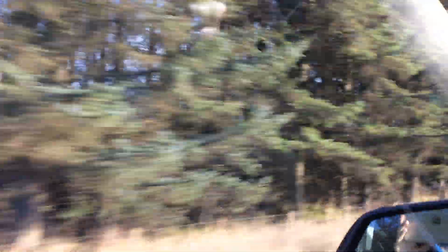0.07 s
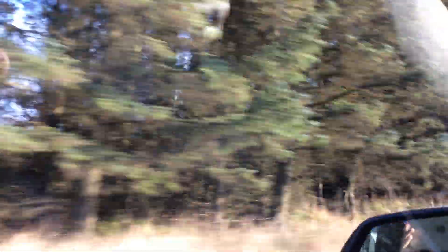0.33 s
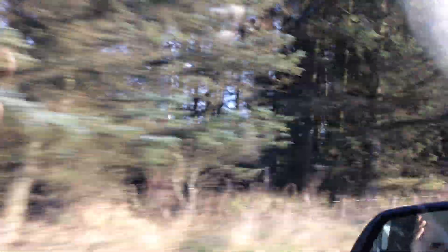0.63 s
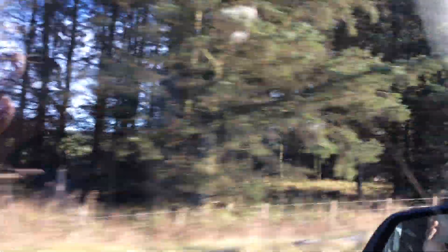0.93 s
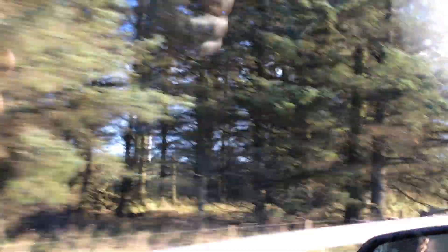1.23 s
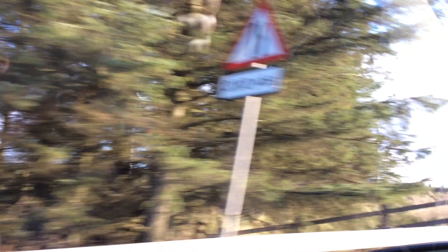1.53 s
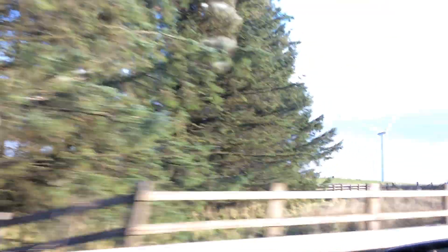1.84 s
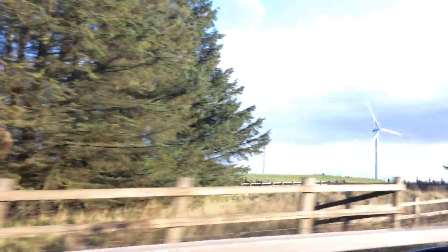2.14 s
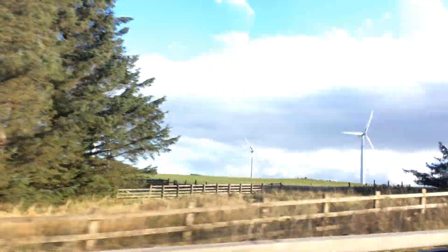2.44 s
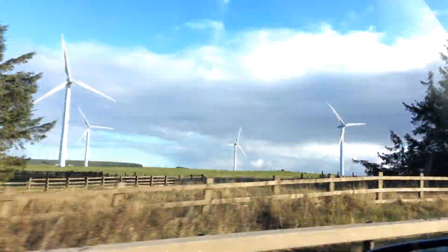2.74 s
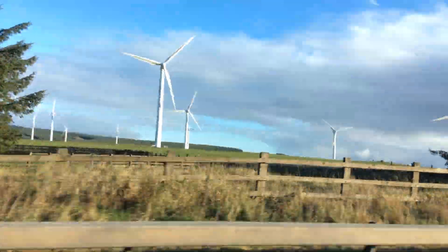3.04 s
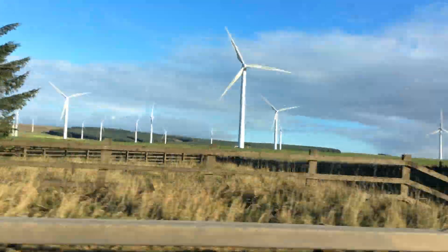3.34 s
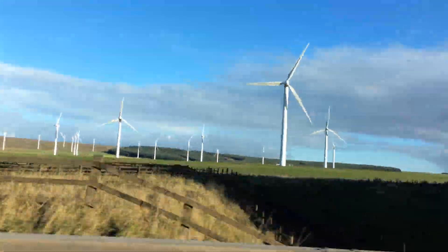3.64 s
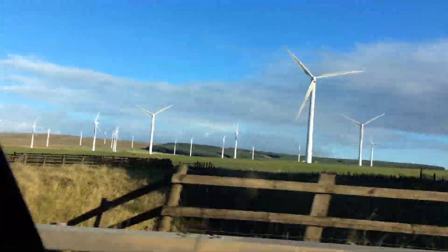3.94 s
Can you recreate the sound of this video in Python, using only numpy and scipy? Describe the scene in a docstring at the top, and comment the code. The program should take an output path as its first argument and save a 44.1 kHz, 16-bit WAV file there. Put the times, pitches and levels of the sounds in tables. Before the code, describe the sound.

Wind buffets a microphone at a moving car's side window, fluttering low with a few ticks and bumps. It drops away briefly, leaving soft thumps over steady road rumble, then returns as a full hissing rush.

```python
"""Turbulent wind buffeting a phone's microphone at the side window of a moving car.
Its pressure fluctuations are heard as low buffeting, flutter, roar and hiss. The flow drops away for most
of a second, leaving single eddies that thump the microphone port, then returns as a full hissing rush.
Small contacts tick and rub on the phone's case, and the road rumbles steadily underneath."""
import sys
import numpy as np
from scipy import signal
from scipy.fft import rfft, irfft
from scipy.io import wavfile
from scipy.ndimage import uniform_filter1d

SR = 44100
rng = np.random.default_rng(int(sys.argv[2]) if len(sys.argv) > 2 else 0)


def bounce(signal):
    """Save signal as a 16-bit WAV file at the path given by the first command-line argument."""
    frames = np.transpose(np.atleast_2d(signal))
    limited = np.clip(frames, -1, 1)
    pcm = np.round(limited * 32767).astype(np.int16)
    wavfile.write(sys.argv[1], SR, pcm)


N = 176400
CUTOFF_HZ = 16500


def wind():
    """Turbulence: eddies carried past the microphone modulate several bands of pressure noise together."""
    # strength of the turbulence: time_s, buffet_db, flutter_db, roar_db
    levels = [(0.02, -28.5, -37.5, -50.5), (0.14, -33, -44, -58), (0.22, -26.5, -43.5, -57),
              (0.29, -32, -51.5, -63.5), (0.36, -33, -46.5, -61.5), (0.39, -29.5, -36.5, -51.5),
              (0.48, -30, -37, -52), (0.62, -34, -41, -52), (0.7, -29.5, -39.0, -50.5),
              (0.85, -30.5, -37, -52.5), (0.97, -31, -37.3, -53), (1.07, -33.5, -34, -56),
              (1.2, -30.5, -40.5, -55), (1.33, -30.5, -42.5, -56.5), (1.4, -28, -41.5, -55),
              (1.5, -31.5, -36.5, -52), (1.62, -29, -38, -51), (1.8, -27, -35.5, -49),
              (1.92, -27.5, -39.5, -52), (2.02, -32, -38.5, -57), (2.11, -33.5, -48.5, -60),
              (2.18, -43, -56.5, -67), (2.3, -46.5, -57, -69), (2.47, -54, -61.5, -78),
              (2.56, -40.5, -63, -77), (2.68, -52, -64.5, -77.5), (2.95, -45, -69, -86),
              (3.01, -35.5, -45.5, -59.5), (3.08, -28.5, -34, -45.5), (3.25, -26, -32.5, -47.5),
              (3.37, -28.5, -37.5, -52), (3.45, -29, -38.5, -52.5), (3.58, -24.5, -35, -53),
              (3.72, -32.5, -39.5, -51.5), (3.83, -29.5, -37, -53), (3.98, -30.5, -38.5, -53.5)]
    # spectra of its low, middle and upper bands: frequency_hz, relative_db
    buffet_spectrum = [(18, -18), (28, -7.5), (42, 1.5), (58, -1.5), (78, -4), (100, 4), (122, 1.5),
                       (150, -3), (190, -7.5), (240, -15.5), (400, -45.5)]
    flutter_spectrum = [(110, -14.5), (185, -1), (225, 1.5), (262, -4.5), (300, -1.5), (360, -9),
                        (450, -13), (600, -18), (800, -27), (1300, -49.5)]
    roar_spectrum = [(400, -8), (620, 2.5), (790, -3.5), (1000, 0.5), (1300, -7), (1750, -14.5),
                     (2300, -24), (3000, -36), (5000, -48.5)]
    buffet_db, flutter_db, roar_db = in_time(levels)
    pressure = steadied(coloured(buffet_spectrum), window_s=0.029)
    swell = drift(rate_hz=44)
    flutter = coloured(flutter_spectrum) * from_db(1.8 * swell + 1.5 * pressure)
    roar = coloured(roar_spectrum) * from_db(0.92 * swell + 0.25 * pressure)
    return (from_db(buffet_db) * pressure
            + from_db(flutter_db) * steadied(flutter, window_s=0.032)
            + from_db(roar_db) * steadied(roar, window_s=0.086)
            + hiss(swell) + gust(swell))


def hiss(swell):
    """Flow noise: air streaming over the port sounds dull when weak and bright when strong."""
    # strength of the stream: time_s, level_db
    stream = [(.02, -77), (.25, -93), (.355, -89), (.38, -71.5), (.43, -80), (.49, -82), (.525, -67),
              (.57, -66), (.65, -72.5), (.85, -76), (1.1, -88.5), (1.39, -86), (1.43, -75), (1.48, -87),
              (1.58, -74), (1.66, -67.5), (1.78, -76), (2.0, -93), (2.2, -92), (2.97, -92.5), (3.035, -71),
              (3.08, -61.5), (3.22, -60.5), (3.37, -64), (3.47, -62.5), (3.6, -61), (3.7, -63.5),
              (3.79, -61.5), (3.89, -64), (3.95, -62.5)]
    # spectra of a strong and a weak stream: frequency_hz, relative_db
    bright_spectrum = [(900, -4), (1700, 9.5), (2600, 1.8), (4000, -2), (6000, -6.5), (8300, -10.5),
                       (10000, -16.5), (12500, -19.5), (13500, -26.5), (16000, -35)]
    dull_spectrum = [(900, -6), (1500, 0.5), (2100, 1.5), (2800, -5), (4000, -9.5), (5200, -15),
                     (7000, -22.5), (10000, -28)]
    stream_db, = in_time(stream)
    bright = coloured(bright_spectrum) * from_db(4.5 + 0.74 * swell + 0.5 * drift(rate_hz=300))
    dull = coloured(dull_spectrum) * from_db(4)
    crossover_db = -66.5
    bright_share = 1 / (1 + np.exp(crossover_db - stream_db))
    return from_db(stream_db) * (np.sqrt(bright_share) * bright + np.sqrt(1 - bright_share) * dull)


def gust(swell):
    """Flow noise: one brief gust adds a high sizzle, modulated by the same turbulence."""
    # spectrum of the sizzle: frequency_hz, relative_db
    spectrum = [(2500, -11), (4000, -2), (6000, 0), (8500, -3), (10000, -9), (13000, -20)]
    return from_db(-66 + swell) / (1 + away(s=3.53, ms=103) ** 4) * coloured(spectrum)


def eddies():
    """Transient response: each eddy is a steep pressure pulse; the port, a resonant high-pass, rebounds."""
    # eddies striking the microphone: start_s, gain_db, length_ms, cutoff_hz
    strikes = [(0.5274, -6, 1.26, 830), (0.7491, -5.5, 1.5, 530), (2.0009, -13.5, 2.6, 403),
               (2.114, -16, 2.7, 680), (2.131, -20.5, 3.1, 330), (2.198, -22, 4.1, 166),
               (2.3287, -21.5, 3.8, 146), (2.4005, -12, 3.5, 660), (2.577, -15.5, 7.3, 125),
               (2.609, -17, 5.3, 126), (2.6308, -16.5, 5, 590), (2.698, -25.5, 3.5, 190),
               (2.810, -22.5, 3, 193), (2.989, -18.5, 4.5, 218), (3.071, -13.5, 2.6, 496)]
    rise_lengths, churn_lengths = 0.13, 1.6   # time constants, in eddy lengths
    churn = from_db(-11) * rng.standard_normal(N)
    thumps = np.zeros(N)
    for start_s, gain_db, length_ms, cutoff_hz in strikes:
        age = np.minimum(away(start_s, length_ms), 20)
        pulse = (seconds() >= start_s) * (1 - np.exp(-age / rise_lengths)) * np.exp(-age ** 2)
        churned_air = churn * np.exp(-age / churn_lengths)   # both before and after the front
        thumps += from_db(gain_db) * lowpass(pulse + churned_air, cutoff_hz, order=6)
    port_hz, port_q = 66.6, 1.34
    omega = 2 * np.pi * port_hz
    port = signal.bilinear([1, 0, 0], [1, omega / port_q, omega * omega], SR)
    return signal.lfilter(*port, thumps)


def ticks():
    """Impact noise: each tick on the case has its own loudness, brightness and length of gritty tail."""
    # contacts on the case: start_s, gain_db, cutoff_hz, grit_decay_ms
    contacts = [(0.5126, -23.5, 2900, .3), (0.5288, -19.5, 3300, .3), (0.5374, -31, 7500, .3),
                (0.5527, -29, 4300, .4), (.5541, -29, 10500, .3), (.5568, -41, 10000, .4),
                (.5707, -44, 8500, .3), (0.5802, -40, 8500, .4), (0.6115, -40.5, 7500, .3),
                (0.7501, -29, 3000, .3), (1.4301, -33, 6500, .4), (1.4435, -30.5, 3500, 1.5),
                (1.542, -35, 3700, 1), (1.6142, -40, 8000, .6), (1.6275, -36, 9000, .5),
                (1.634, -35, 9000, .5), (1.6693, -39.5, 6300, .4), (1.6815, -44, 9000, .4),
                (1.7046, -43, 7460, .4), (2.094, -45, 5000, 1), (2.3847, -45, 3400, .8),
                (2.8849, -49, 8500, .8), (3.0214, -43, 8000, .8), (3.0535, -34, 9000, .5),
                (3.077, -32, 6500, .4), (3.671, -31, 7500, 1.6), (3.7774, -30, 7800, 2.2)]
    grit = from_db(-18.5) * rng.standard_normal(N)
    clicks = np.zeros(N)
    for start_s, gain_db, cutoff_hz, grit_decay_ms in contacts:
        force = grit * (seconds() > start_s) * cusp(start_s, grit_decay_ms) + 1e-18
        force[int(start_s * SR)] = 1
        clicks += from_db(gain_db) * lowpass(force, cutoff_hz)
    case_band = signal.butter(2, [1100, 11500], "band", fs=SR, output="sos")
    return signal.sosfilt(case_band, clicks)


def rubs():
    """Friction noise: light brushes on the case give smooth noise, dragging scuffs a run of crackles."""
    # sliding contacts: peak_s, level_db, time_constant_ms
    brushes = [(0.528, -46, 5.8), (1.438, -54.5, 15), (1.54, -57, 8), (2.095, -56, 6.4), (2.384, -51, 5.2),
               (2.885, -60, 4.1), (3.779, -43, 3)]
    scuffs = [(.561, -61.5, 16), (1.66, -66, 40)]
    # their spectra: frequency_hz, relative_db
    brush_spectrum = [(300, 7), (900, 9), (2200, -3), (3500, -9.5), (5000, -17.5), (9000, -24),
                      (15000, -33.5)]
    crackle_spectrum = [(600, 7.5), (1800, 6), (3500, 2.5), (6000, -4), (9000, -3), (12000, -15),
                        (16000, -28.5)]
    brushing = sum(from_db(db) * cusp(s, ms) for s, db, ms in brushes)
    scuffing = sum(from_db(db) * cusp(s, ms) for s, db, ms in scuffs)
    crackles_per_s = 1200
    crackles = (rng.random(N) < crackles_per_s / SR) * rng.uniform(-0.87, 1, N)
    return brushing * coloured(brush_spectrum) + scuffing * tinted(crackles, crackle_spectrum)


def road():
    """Structure-borne noise: the tyres and the car's body radiate a steady drone into the cabin."""
    # spectrum of the drone: frequency_hz, relative_db
    spectrum = [(20, -10.5), (45, -3), (80, 4.5), (118, -5.5), (175, -17), (260, -31), (380, -25),
                (620, -28), (800, -42.5), (1020, -40), (1300, -47), (2000, -51.5), (3000, -52.5),
                (9300, -54), (12000, -60), (15000, -78.5)]
    return from_db(-48) * steadied(coloured(spectrum), window_s=0.071)


def from_db(db):
    """Decibels to amplitude ratio."""
    return 10 ** (np.asarray(db) / 20)


def rms_one(x):
    """Scale to unit rms."""
    return x / np.sqrt(np.mean(x ** 2) + 1e-20)


def seconds():
    """Time of every sample."""
    return np.arange(N) / SR


def away(s, ms):
    """Distance in time from the moment s, in spans of ms milliseconds."""
    return abs(seconds() - s) * 1000 / ms


def cusp(s, ms):
    """Exponential rise and decay about the moment s, with time constant ms."""
    return np.exp(-np.minimum(away(s, ms), 20))


def in_time(rows):
    """Linear interpolation of each column over the times in the first."""
    times_s, *columns = np.transpose(rows)
    return [np.interp(seconds(), times_s, column) for column in columns]


def lowpass(x, cutoff_hz, order=2):
    """Maximally flat low-pass filter."""
    return signal.sosfilt(signal.butter(order, cutoff_hz, fs=SR, output="sos"), x)


def tinted(x, spectrum):
    """Spectral shaping to unit rms; the gain falls 12 dB per octave beyond the table's ends."""
    hz, db = np.transpose(spectrum)
    bin_hz = np.maximum(np.arange(N // 2 + 1) * SR / N, 1)
    skirts = np.minimum(bin_hz / hz[0], 1) ** 2 * np.minimum(hz[-1] / bin_hz, 1) ** 2
    gain = from_db(np.interp(np.log(bin_hz), np.log(hz), db))
    return rms_one(irfft(rfft(x) * skirts * gain, N))


def coloured(spectrum):
    """Noise of the given spectrum and unit rms."""
    return tinted(rng.standard_normal(N), spectrum)


def drift(rate_hz):
    """Smooth random fluctuation of unit rms."""
    return rms_one(lowpass(rng.standard_normal(N + SR), rate_hz)[SR:])


def steadied(x, window_s):
    """Division by the running rms keeps fast fluctuations and holds the slow level at 1."""
    size = max(int(window_s * SR), 8)
    power = uniform_filter1d(uniform_filter1d(x ** 2, size), size)
    return x / np.sqrt(power + 1e-12)


def scene():
    """Superposition: the pressures of all sources add at one microphone."""
    return (road() + wind() + eddies() + ticks() + rubs())[None]


def record(dry):
    """Band limiting: the microphone softens the highest treble, and a steep filter cuts the top."""
    softened = lowpass(dry, cutoff_hz=12500)
    return signal.sosfilt(signal.cheby2(12, 70, CUTOFF_HZ, fs=SR, output="sos"), softened)


dry = scene()
out = record(dry)
bounce(out)
```